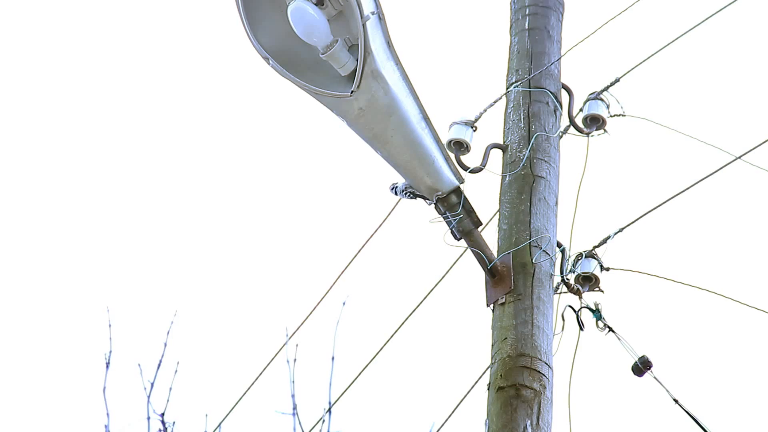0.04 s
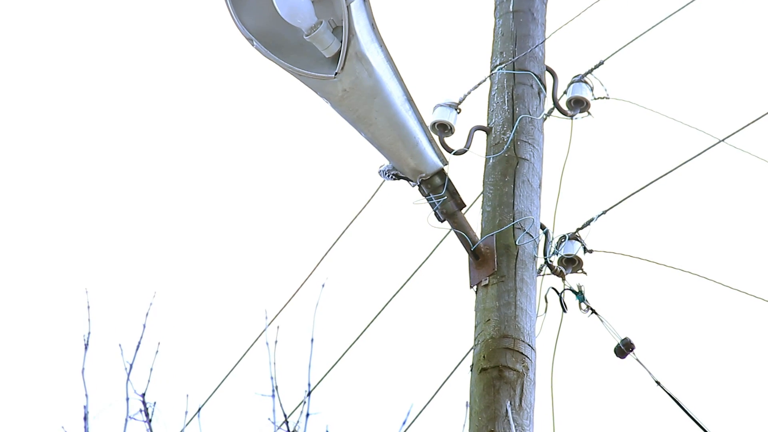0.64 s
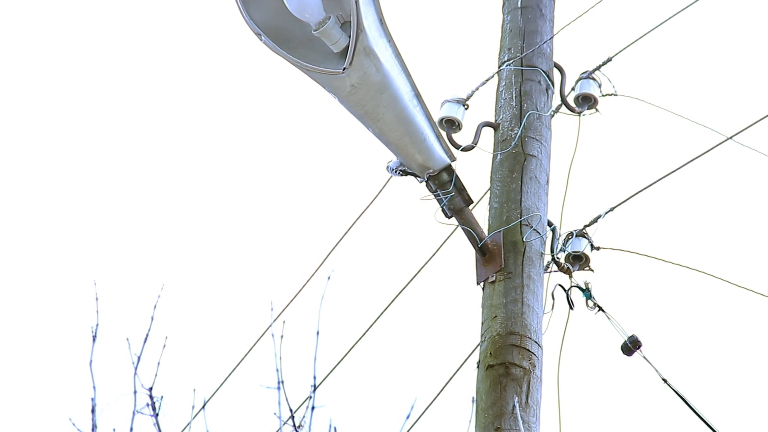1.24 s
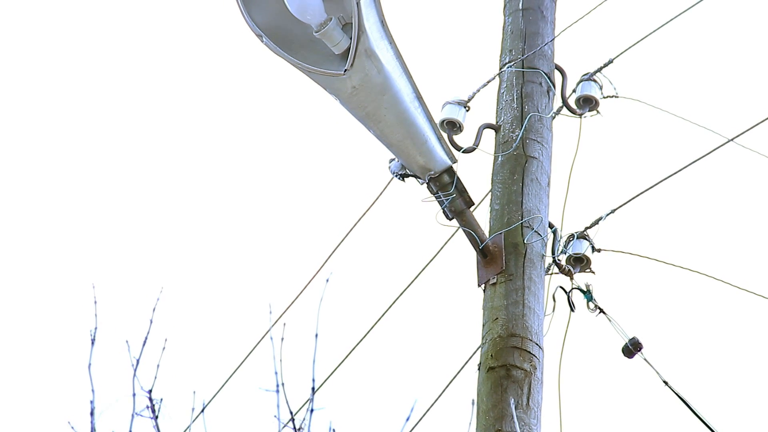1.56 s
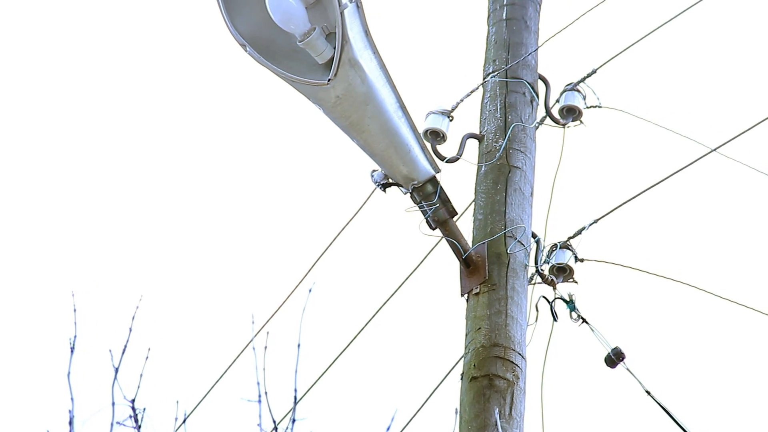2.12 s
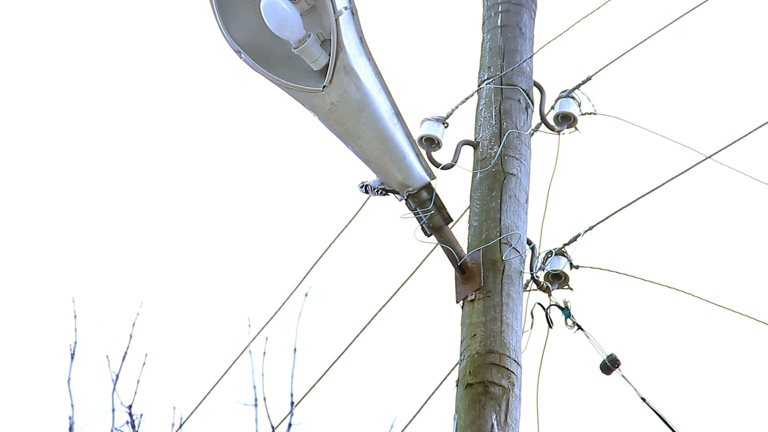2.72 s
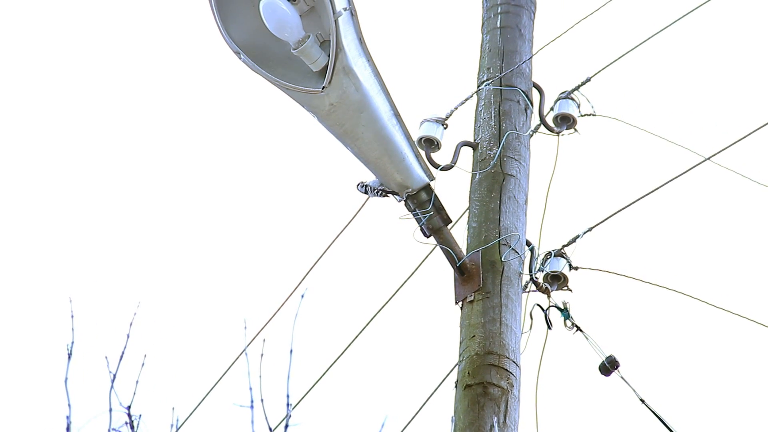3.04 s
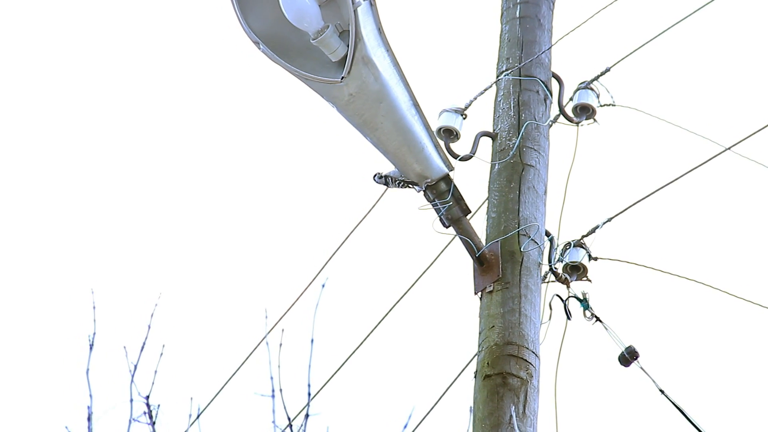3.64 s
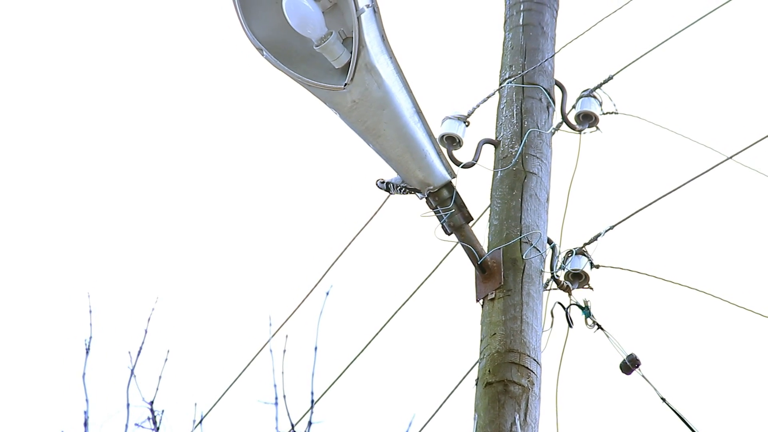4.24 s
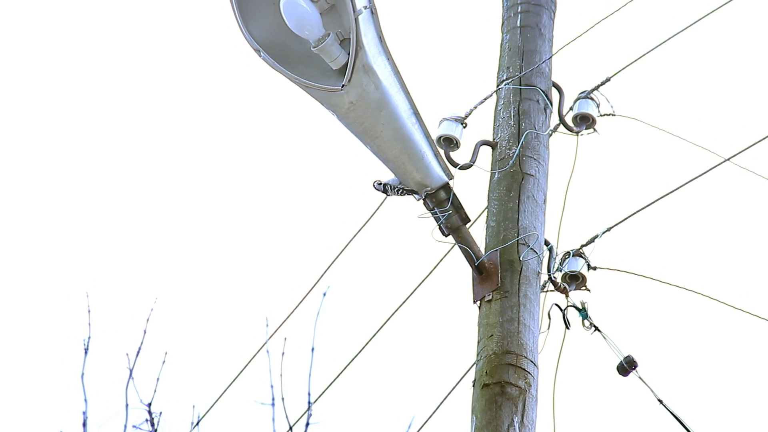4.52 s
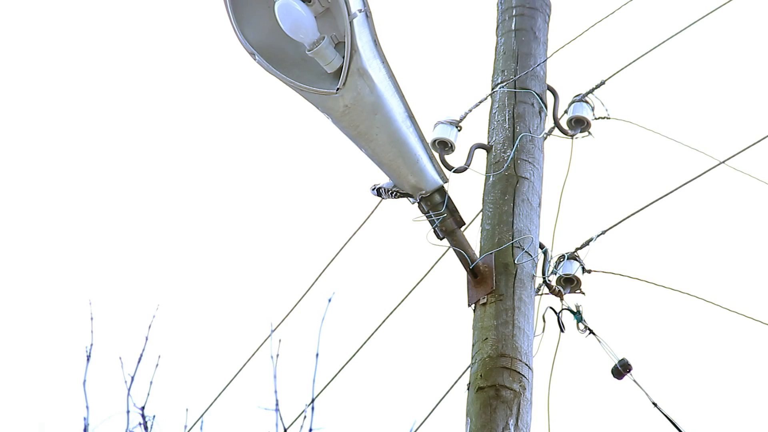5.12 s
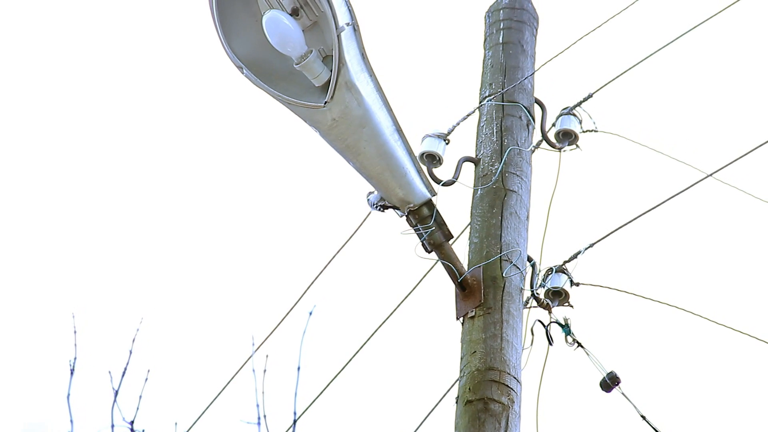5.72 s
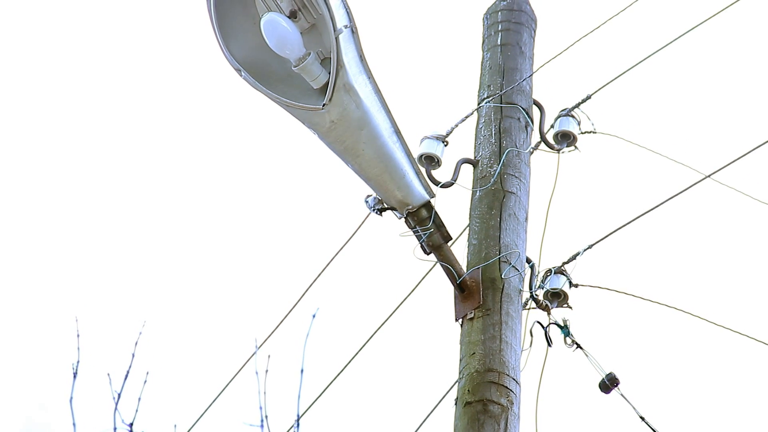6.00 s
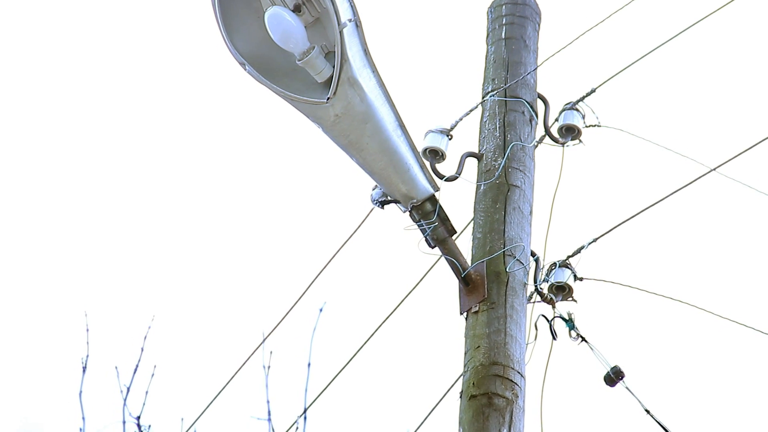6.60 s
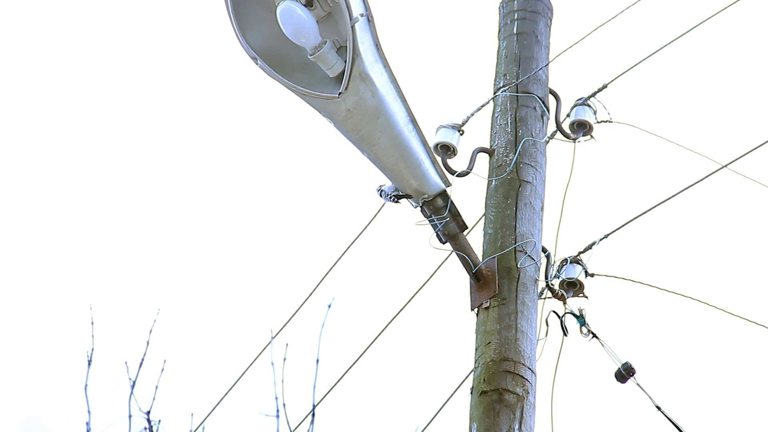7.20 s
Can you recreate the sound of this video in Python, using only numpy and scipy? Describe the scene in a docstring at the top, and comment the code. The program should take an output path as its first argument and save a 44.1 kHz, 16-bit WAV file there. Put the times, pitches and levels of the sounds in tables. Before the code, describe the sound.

A quiet outdoor wash of distant traffic runs throughout, with faint ticks, raspy cheeps and short whistles from small birds. At about 1.2 seconds a far crow gives one soft, hoarse caw. From 1.5 to 2.6 seconds a nearby woodpecker drums on the metal housing of a street lamp, far louder than everything else, at 17 to 18 blows a second. Each blow rings the hollow body and makes its thin sheet clatter brightly; the roll starts slightly softer, peaks quickly and eases a little, leaving a short street echo. Faint ticks and chirps continue through the pause. A far engine hum swells gently around 5.6 seconds and fades. From about 5.8 to 7 seconds the woodpecker drums a second, slightly longer roll with the same metallic rattle, and its echo dies away into the background traffic.

```python
"""Small birds tick and chirp over distant traffic, a crow caws hoarsely, and then the main sound begins:
a woodpecker drums two rolls on the metal housing of a street lamp, 17 to 18 blows a second.
Each blow rings the hollow housing and makes its thin sheet clatter; the street throws it back.
A far engine swells and fades around the start of the second roll."""
import sys
import numpy as np
from scipy import signal
from scipy.fft import rfft, irfft
from scipy.io import wavfile
from scipy.ndimage import uniform_filter1d

SR = 44100
rng = np.random.default_rng(int(sys.argv[2]) if len(sys.argv) > 2 else 0)


def output_pcm(signal):
    """Save a mono or channel-first signal as 16-bit PCM at the path in sys.argv[1].

    Samples are clipped to [-1, 1] before scaling.
    """
    pcm = np.clip(np.atleast_2d(signal).T, -1, 1) * 32767
    wavfile.write(sys.argv[1], SR, np.round(pcm).astype(np.int16))


N = 320166
RING_SAMPLES, BAND_LIMIT_HZ = 11000, 16050


# Drum rolls. Each row: first blow in seconds, last blow in seconds, beat in seconds, shortening of the
# first beat in seconds, force in dB, sag in dB per second, final fade in dB, fade length in seconds.
DRUM_ROLLS = [(1.53, 2.553, .05714, .0054, -19.5, 2, 2.5, 0.068),
              (5.766, 6.952, .05685, .0029, -20, 2.5, 1.7, 0.21)]

def woodpecker(echo_s=.0289, echo_db=-14, highpass_hz=205):
    """Every blow rings housing and sheet; a nearby surface returns it once."""
    out, echo = np.zeros(N), np.zeros(N)
    times, forces_db, treble_db, into_roll_s = np.vstack([roll(*row) for row in DRUM_ROLLS]).T
    rings = housing(len(times)) + sheet(treble_db) + contact_ping(into_roll_s) + knock()
    for start_s, force_db, ring in zip(times, forces_db, rings):
        add(out, start_s, gain_of(force_db) * ring)
    highpass = signal.butter(8, highpass_hz, "high", fs=SR, output="sos")  # a small body radiates no bass
    out = signal.sosfilt(highpass, out)
    add(echo, echo_s, coloured(out, [(2500, -8), (9000, -7)]))
    return out + gain_of(echo_db) * echo


def roll(first_s, last_s, beat_s, hurry_s, full_db, sag_db_per_s, fade_db, fade_s,
         settle_blows=4.8, soft_start_db=3.5, warm_up_s=.15, uneven_s=.0003, uneven_db=.36):
    """One row per blow: the roll starts hurried and soft, peaks, tires and fades."""
    blow = np.arange(round((last_s - first_s) / beat_s))
    beats_s = beat_s - hurry_s * np.maximum(1 - blow / settle_blows, 0)
    t = np.append(np.cumsum(beats_s) - beats_s, last_s - first_s)
    early, harder = rng.standard_normal((len(t), 2)).T
    starting = np.maximum(1 - t / warm_up_s, 0)
    ending = np.maximum(1 - (t[-1] - t) / fade_s, 0)
    effort_db = uneven_db * harder - soft_start_db * starting - sag_db_per_s * t - fade_db * ending
    treble_db = 2.6 + .74 * effort_db  # softer blows are duller
    return np.transpose([first_s + t - uneven_s * early, full_db + effort_db, treble_db, t])


# Lamp housing modes. Each row: frequency in Hz, relative level in dB, T60 in seconds.
HOUSING_MODES = [(230, -15, .24), (280, -7.5, .25), (364, -6, .17), (510, -6, .17), (545, -12, .13),
                 (650, -9.5, .23), (682, -9.5, .24), (775, -8.5, .13), (869, -14, .16), (924, -9, .23),
                 (1033, -1, .17), (1097, -1, .15), (1142, 1, .1), (1239, -7.5, .18), (1387, -9, .14),
                 (1528, .5, .13), (1566, -10, .16), (1657, -1, .11), (1695, -9, .09), (1951, -8, .12),
                 (2058, -15, .16), (2173, -11, .11), (2245, -9, .13), (2640, -1, .06), (3063, -11, .12),
                 (3868, -14, .11), (4111, -16, .15)]

def housing(blows, rise_s=.012, vary_db=.52, gain_db=2.1, weak_below_hz=290, travel_at_1khz_s=.007):
    """The hollow body swells after each blow as bending waves spread through it."""
    hz, db, t60 = np.transpose(HOUSING_MODES)
    t = np.arange(RING_SAMPLES) / SR
    lag_turns = 2 * travel_at_1khz_s * np.sqrt(1000 * hz)  # low bending waves travel slower
    phase = np.pi * rng.uniform(-.54, .41, len(hz)) - 2 * np.pi * lag_turns
    shares = gain_of(gain_db + db + vary_db * rng.standard_normal((blows, len(hz))))
    radiated = hz / np.hypot(hz, weak_below_hz)  # the lowest modes move little air
    swell = np.minimum(.31 + t / rise_s, 1)
    return (shares * radiated) @ ringing(hz, t60, phase, t) * swell


# Sheet spectrum. Each row: frequency in Hz, relative level per mode in dB.
SHEET_SPECTRUM = [(400, -30.5), (800, -18), (1200, -19.5), (2000, -19.5), (2700, -15.5), (3600, -23),
                  (4500, -24.5), (5200, -23), (6200, -28), (7400, -29), (8600, -29), (11500, -31),
                  (14000, -36.5), (16000, -41)]
# Sheet decay. Each row: frequency in Hz, T60 in seconds.
SHEET_DECAY = [(500, 0.4), (2500, 0.23), (5000, 0.17), (9000, 0.094), (15000, 0.093)]

def sheet(treble_db, count=800, lowest_hz=400, vary=.43, drift=.55, rise_s=.00056, gain_db=-.5):
    """Crowded modes of thin metal; their shares drift as the beak lands on slightly different spots."""
    slots = np.arange(count) + rng.uniform(.1, .9, count)
    hz = lowest_hz + slots * (BAND_LIMIT_HZ - lowest_hz) / count
    t = np.arange(RING_SAMPLES) / SR
    spot = unit_rms(uniform_filter1d(rng.standard_normal((len(treble_db), count)), size=7, axis=0))
    shares = 1 + vary * rng.standard_normal(spot.shape) + drift * spot
    shares /= np.sqrt(1 + vary ** 2 + drift ** 2)
    tilt_db = treble_db[:, None] * np.clip(hz / 6000, 0, 1)
    shares *= gain_of(gain_db + curve_at(SHEET_SPECTRUM, hz) + tilt_db)
    modes = ringing(hz, curve_at(SHEET_DECAY, hz), 2 * np.pi * rng.random(count), t)
    return np.float32(shares) @ modes * np.minimum(t / rise_s, 1)


def contact_ping(into_roll_s, base_hz=5210, sag_hz_per_s=192, peak_s=.004, fall=.022, gain_db=-5.5):
    """A bright ping at the point of contact; its pitch sinks within each blow and through the roll."""
    age = np.arange(RING_SAMPLES) / SR / peak_s
    glide = 1 + fall * (1.5 - np.minimum(age, 5))
    turns = (base_hz - sag_hz_per_s * into_roll_s[:, None]) * np.cumsum(glide) / SR
    return gain_of(gain_db) * age * np.exp(1 - age) * np.sin(2 * np.pi * turns)


def knock(delay_s=.0067, width_s=.00008, gain_db=8):
    """A hard pulse bursts from the housing just after contact."""
    t = np.arange(RING_SAMPLES) / SR
    return gain_of(gain_db) * np.exp(-((t - delay_s) / width_s) ** 2)


# Caw contour. Each row: time in seconds, relative level in dB, pitch in Hz.
CAW_CONTOUR = [(1.24, -66, 269.4), (1.27, -50, 295.6), (1.31, -45, 325), (1.37, -46, 311),
               (1.44, -45.5, 313.6), (1.51, -45.5, 305), (1.56, -42, 290)]
# Crow throat response. Each row: frequency in Hz, gain in dB.
CROW_THROAT = [(500, -31), (950, -4.5), (1280, -4.5), (1600, 0), (1880, 1.5), (2200, -8), (2500, -4.5),
               (2850, -17), (3500, -35)]

def crow(rough=.45, jitter=.014, rattle_hz=95, rattle_depth=.56, gain_db=2):
    """Harmonics and breath noise pass through a fixed throat, chopped by a fast rattle."""
    times, levels_db, pitches_hz = np.transpose(CAW_CONTOUR)
    t = np.arange(times[0], times[-1], 1 / SR)
    hz = np.interp(t, times, pitches_hz) * (1 + jitter * wander(len(t), size=120))
    turns = np.cumsum(hz) / SR
    harmonics = sum(np.cos(2 * np.pi * (k * turns + rng.random())) for k in range(2, 11))
    rattle_turns = np.cumsum(rattle_hz * (1 + .063 * wander(len(t), size=400))) / SR
    chop = 1 + rattle_depth * np.cos(2 * np.pi * rattle_turns)
    tone = unit_rms(coloured(harmonics, CROW_THROAT))
    breath = unit_rms(coloured(rng.standard_normal(len(t)), CROW_THROAT))
    voice = unit_rms(((1 - rough) * tone + rough * breath) * chop)
    out = np.zeros(N)
    add(out, times[0], gain_of(gain_db + np.interp(t, times, levels_db)) * voice)
    return out


# Dry bird ticks. Each row: time in seconds, relative level in dB.
BIRD_TICKS = [(.468, -45.5), (.549, -44), (.936, -50), (.974, -51), (.989, -49), (1.015, -48), (3.073, -48),
              (3.113, -49), (3.164, -49.5), (3.216, -46), (3.245, -49), (3.898, -49), (4.279, -49.5),
              (5.185, -48), (5.234, -45), (5.477, -50), (5.519, -46)]
# Tick spectrum. Each row: frequency in Hz, gain in dB.
TICK_SPECTRUM = [(2800, -23), (3600, -2), (4300, 6), (5100, -13), (5900, -3), (7000, -24), (8300, 0),
                 (9400, -25), (12000, -33)]

def bird_ticks(peak_s=.00199, gain_db=-2.7):
    """Tiny puffs through a small bird's narrow throat."""
    out = np.zeros(N)
    age = np.arange(1024) / SR / peak_s
    for time_s, db in BIRD_TICKS:
        puff = unit_rms(coloured(rng.standard_normal(len(age)), TICK_SPECTRUM))
        add(out, time_s - peak_s / 2, gain_of(db + gain_db) * puff * age * np.exp(1 - age))
    return out


# Cheeps. Each row: start in seconds, relative level in dB.
BIRD_CHEEPS = [(.425, -51), (3.418, -51), (3.862, -54), (5.018, -51), (5.562, -55)]
# Whistles. Each row: start and length in seconds, first, middle and last pitch in Hz, relative level in dB.
BIRD_WHISTLES = [(.132, .016, 5800, 6600, 7300, -56), (.32, .016, 5900, 6700, 7500, -52),
                 (.82, 0.056, 3250, 3750, 3300, -48), (.899, .05, 3930, 3500, 3800, -53),
                 (1.205, .071, 4400, 3900, 2900, -54), (3.32, .09, 4200, 3810, 3720, -51),
                 (3.48, .024, 3700, 3100, 3050, -52), (4.848, .06, 5500, 5000, 4500, -54)]

def bird_calls(cheep_s=.085, cheep_hz=(3900, 5200, 3700, 3330, 3500, 4000), gain_db=-3):
    """Raspy cheeps, all of one tune, and cleaner slurred whistles."""
    out = np.zeros(N)
    for start_s, db in BIRD_CHEEPS:
        add(out, start_s, gain_of(db + gain_db) * chirp(cheep_s, cheep_hz, warble=.045, flutter=.45))
    for start_s, length_s, *tune_hz, db in BIRD_WHISTLES:
        add(out, start_s, gain_of(db + gain_db) * chirp(length_s, tune_hz, warble=.018, flutter=.32))
    return out


def chirp(length_s, tune_hz, warble, flutter):
    """A fluttering whistle glides through the given pitches at even time steps."""
    along = np.linspace(0, 1, round(length_s * SR))
    hz = np.interp(along, np.linspace(0, 1, len(tune_hz)), tune_hz)
    hz *= 1 + warble * wander(len(along), size=40)
    swell = np.sin(np.pi * along) * (1 + flutter * wander(len(along), size=150))
    return swell * sine(hz)


def far_songbirds(count=170, centre_hz=3900, faintest_db=-72, spread_db=8.7):
    """Many short faint glides from birds much farther off."""
    out = np.zeros(N)
    for when, pitch, glide, length, loud in rng.random((count, 5)):
        along = np.linspace(0, 1, round((.0293 + .05 * length) * SR))
        tune = 1 + .3 * (pitch - .5) + .297 * (glide - .5) * along
        hz = centre_hz * (tune + .02 * wander(len(along), size=40))
        swell = gain_of(faintest_db + spread_db * loud) * np.sin(np.pi * along)
        add(out, when * N / SR, swell * sine(hz))
    return out


# Street echo decay. Each row: frequency in Hz, T60 in seconds.
STREET_DECAY = [(250, 0.8), (1000, 0.5), (2500, 1.14), (5000, 0.82), (12000, 0.3)]
# Street echo spectrum. Each row: frequency in Hz, gain in dB.
STREET_SPECTRUM = [(250, -6), (1000, -7.5), (2500, -13.5), (5000, -15), (12000, -11.5)]

def street(sound, build_s=.026, crossfade_hz=.692, count=3):
    """Scattered echoes build up and die, the top treble first; three tails crossfade to keep it smooth."""
    hz, t, noise = signal.stft(rng.standard_normal((count, SR)), SR, nperseg=256)
    t60 = curve_at(STREET_DECAY, hz)[:, None]
    decay = gain_of(curve_at(STREET_SPECTRUM, hz)[:, None] - 60 * t / t60)
    energy_norm = np.sqrt(2 * np.log(1000) / t60 / SR)
    tails = signal.istft(noise * decay * energy_norm, SR, nperseg=256)[1]
    tails *= np.minimum(np.arange(tails.shape[1]) / SR / build_s, 1)
    crossfade_turns = crossfade_hz * np.arange(N) / SR + np.arange(count)[:, None] / count
    feeds = sound * abs(np.sin(np.pi * crossfade_turns)) * np.sqrt(2 / count)
    return signal.fftconvolve(feeds, tails, axes=1).sum(0)[:N]


def far_engine(peak_s=5.65, firing_hz=131.5, peak_db=-50.5, half_width_s=.4, waver=.039):
    """The wavering firing note of a far vehicle swells and fades."""
    away = (np.arange(N) / SR - peak_s) / half_width_s
    hz = firing_hz * (1 + waver * wander(N, size=1500))
    swell = gain_of(peak_db) / np.hypot(1, away ** 2)
    return swell * np.sqrt(2) * sine(hz)


# Spectrum of distant traffic and air. Each row: frequency in Hz, relative density in dB.
TRAFFIC_SPECTRUM = [(15, -46), (25, -29), (53, -2), (111, -2), (263, -11.5), (293, -7), (326, -8),
                    (545, -10.5), (796, -6.5), (1260, -9), (2990, -25.5), (4370, -28.5), (6380, -33.5),
                    (12200, -37), (16000, -42)]

def far_traffic(rms_db=-43.5, patchy_db=1.1, hiss_db=-.5, crossover_hz=3000):
    """Far traffic drifts in patches under a smooth hiss."""
    noise = coloured(rng.standard_normal(N), TRAFFIC_SPECTRUM)
    hz, _, spectra = signal.stft(noise, SR, nperseg=1024, noverlap=768)
    patches = uniform_filter1d(rng.standard_normal(spectra.shape), size=8, axis=0)
    patches = unit_rms(uniform_filter1d(patches, size=24, axis=1))
    traffic_share = 1 / (1 + (hz[:, None] / crossover_hz) ** 2)
    drift_db = traffic_share * patchy_db * patches + (1 - traffic_share) * hiss_db
    wash = signal.istft(spectra * gain_of(drift_db), SR, nperseg=1024, noverlap=768)[1][:N]
    return gain_of(rms_db) * unit_rms(wash)


def gain_of(db):
    """Decibels to an amplitude factor."""
    return 10 ** (np.asarray(db) / 20)


def unit_rms(x):
    """Scales to an rms of 1."""
    return x / np.sqrt(np.mean(x ** 2) + 1e-20)


def curve_at(points, hz):
    """Interpolates a table on a log-frequency axis."""
    points_hz, values = np.transpose(points)
    return np.interp(np.log(hz + 1), np.log(points_hz), values)


def add(mix, start_s, sound):
    """Mixes a sound in at start_s."""
    part = mix[max(round(start_s * SR), 0):][:len(sound)]
    part += sound[:len(part)]


def coloured(x, colour):
    """Filters by a (Hz, dB) table."""
    hz = np.fft.rfftfreq(len(x), 1 / SR)
    return irfft(rfft(x) * gain_of(curve_at(colour, hz)), len(x))


def wander(length, size):
    """Random drift of rms 1, smooth over size samples."""
    return unit_rms(uniform_filter1d(uniform_filter1d(rng.standard_normal(length), size), size))


def sine(hz):
    """A sine that follows a pitch curve."""
    return np.sin(2 * np.pi * np.cumsum(hz) / SR)


def ringing(hz, t60, phase, t):
    """One row of decaying cosine per mode."""
    hz, t60, phase, t = (np.float32(v) for v in (hz, t60, phase, t))
    decay = np.exp(np.float32(-np.log(1000)) * t / t60[:, None])
    return np.cos(2 * np.pi * hz[:, None] * t + phase[:, None]) * decay


def scene():
    """The lamp is near; the other birds are farther off and feed the echo 5 dB more."""
    near = woodpecker()
    far = crow() + bird_ticks() + bird_calls() + far_songbirds()
    echoes = street(near + gain_of(5) * far)
    return (near + far + echoes + far_traffic() + far_engine())[None]


def record(dry):
    """The sound fades in over 8 ms after 60 ms of silence and is low-passed."""
    fade_in = np.clip((np.arange(N) / SR - .06) / .008, 0, 1)
    lowpass = signal.firwin(301, BAND_LIMIT_HZ, window=("kaiser", 8), fs=SR)
    return signal.oaconvolve(dry * fade_in, lowpass[None], "same")


dry = scene()
out = record(dry)
output_pcm(out)
```